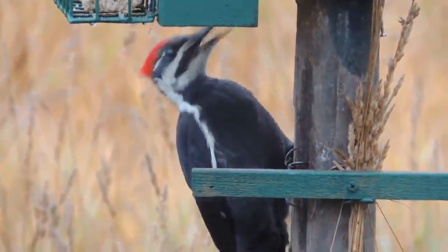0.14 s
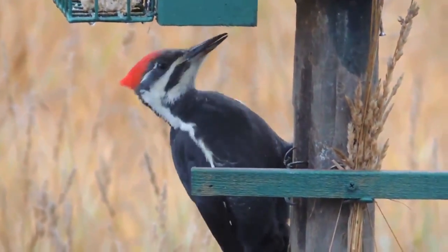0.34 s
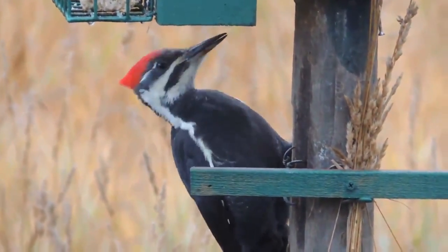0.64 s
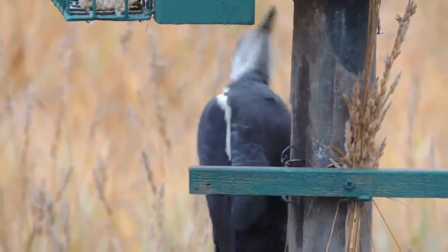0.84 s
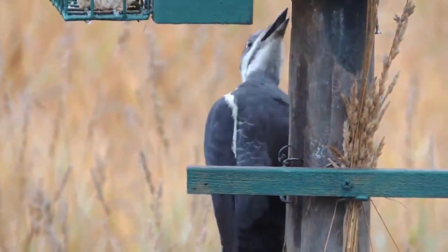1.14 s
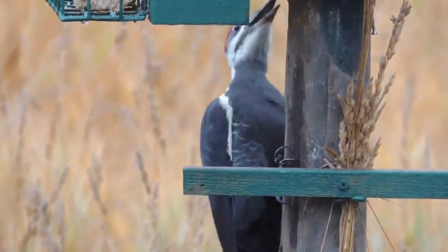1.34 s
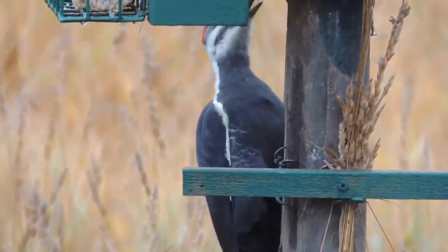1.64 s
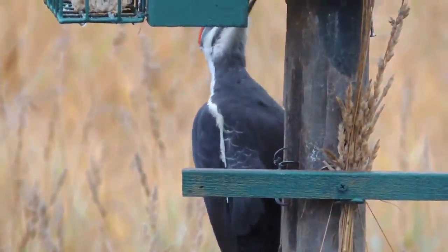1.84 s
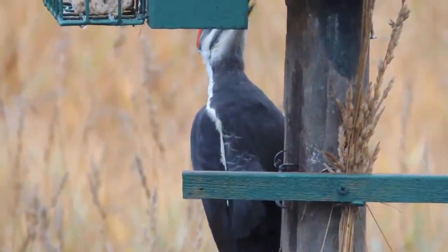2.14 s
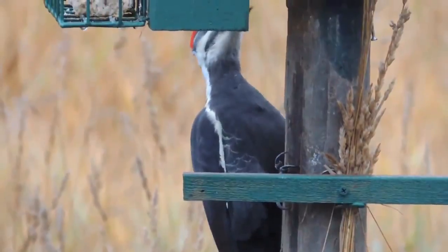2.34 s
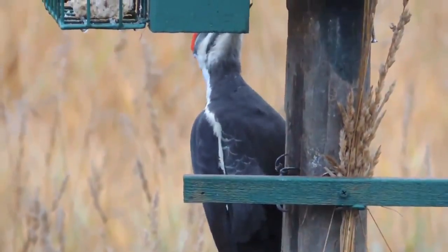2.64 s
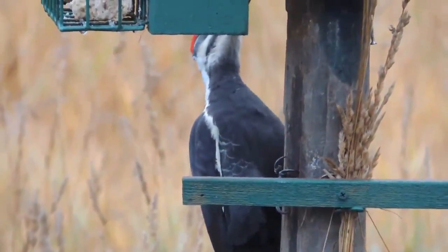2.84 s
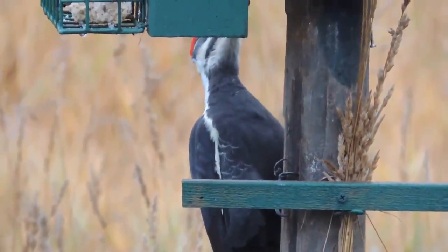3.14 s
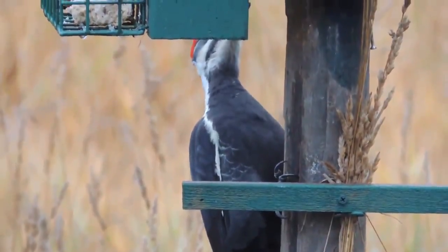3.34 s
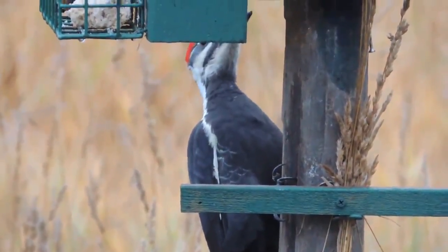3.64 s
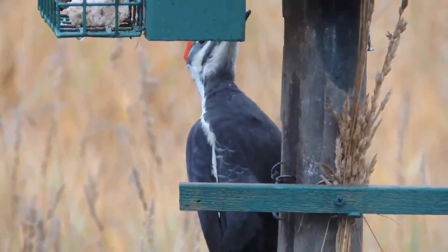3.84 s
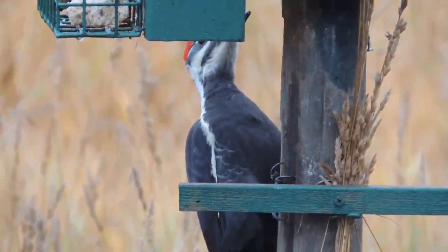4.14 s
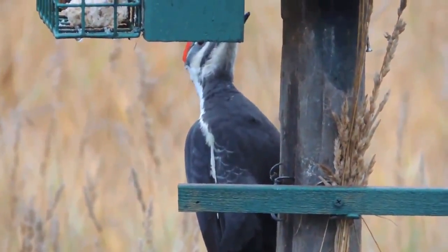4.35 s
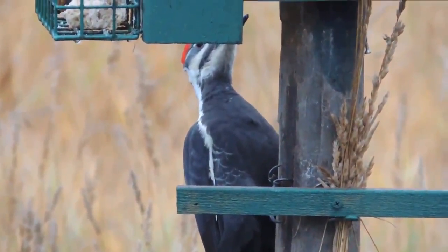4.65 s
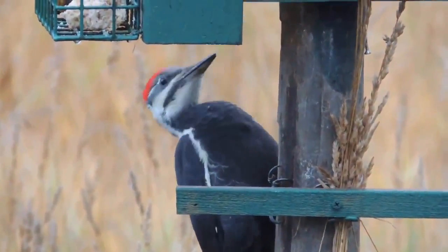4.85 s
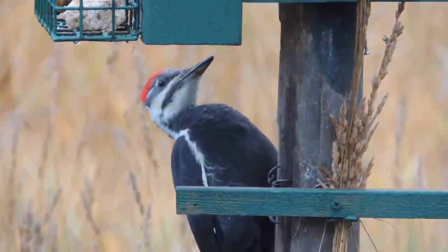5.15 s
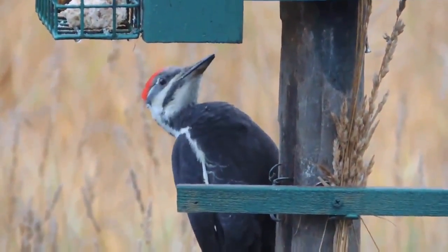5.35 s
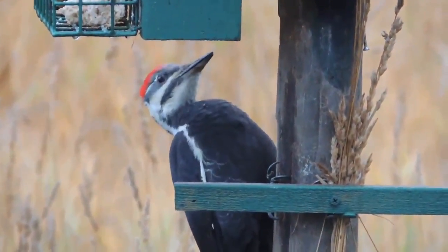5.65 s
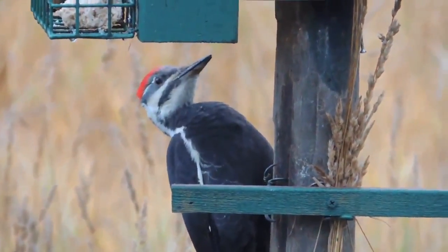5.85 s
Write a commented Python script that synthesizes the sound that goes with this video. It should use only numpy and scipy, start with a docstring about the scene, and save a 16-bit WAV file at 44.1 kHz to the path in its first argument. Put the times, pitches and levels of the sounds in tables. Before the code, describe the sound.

In quiet open air, a woodpecker calls a quick string of short bright yelping notes, followed by small clicks and scrapes.

```python
"""A pileated woodpecker on a feeder post gives one run of fourteen short, arched notes that ring on among the trees.
Each note is a stack of harmonics through moving throat resonances, with noise for the croak and rasp.
Its claws scrape faintly before the call, then tick and scrape on the wood as it shifts: ringing crackle and
grainy noise. Under it lie a faint low hoot, a gliding sine, and the shaped noise of still open air: rumble and hiss."""
import sys
import numpy as np
from scipy import signal
from scipy.fft import rfft, irfft, next_fast_len
from scipy.io import wavfile

SR = 44100
rng = np.random.default_rng(int(sys.argv[2]) if len(sys.argv) > 2 else 0)


def wav_out(sig):
    """Save sig, one row per channel (or a flat mono array), as 16-bit PCM at SR to the path in sys.argv[1]."""
    wavfile.write(sys.argv[1], SR, np.round(np.clip(np.atleast_2d(sig).T, -1, 1) * 32767).astype(np.int16))


N = 264159
TIME = np.arange(N) / SR

# the notes of the call: start_s, length_s, top_pitch_hz, level_db (before voice colour and swell)
CALL_NOTES = [(1.003, 0.039, 875, -32), (1.134, .046, 1004, -26), (1.261, 0.051, 1028, -24.5),
              (1.389, 0.053, 1053, -22), (1.517, 0.055, 1066, -22.5), (1.644, 0.053, 1077, -21),
              (1.772, 0.052, 1071, -18), (1.896, 0.053, 1079, -18.5), (2.021, 0.054, 1077, -18),
              (2.149, 0.057, 1094, -18), (2.282, 0.058, 1101, -17), (2.416, 0.058, 1095, -17.5),
              (2.553, 0.06, 1098, -17.5), (2.694, 0.061, 1079, -18.5)]
# claw ticks on the post: start_s, peak_db (before left-right balance), ring_hz
CLAW_TICKS = [(3.982, -31, 5800), (4.653, -28.5, 9500), (5.109, -39, 10500), (5.138, -30.5, 8150),
              (5.423, -39, 9500), (5.44, -35, 5900), (5.7996, -29.5, 6650), (5.8178, -23, 5940)]


def from_db(db):
    """Decibels to gain."""
    return 10 ** (np.asarray(db) / 20)


def rms_one(x):
    """Scale to unit rms."""
    return x / np.sqrt(np.mean(x ** 2) + 1e-20)


def ramp(x):
    """Hold a share between 0 and 1."""
    return np.clip(x, 0, 1)


def at_hz(points, hz):
    """Read a table on a log-frequency axis."""
    points = np.array(points)
    return np.interp(np.log(np.maximum(hz, 1)), np.log(points[:, 0]), points[:, 1])


def coloured(x, spectrum):
    """Shape noise with an EQ curve of (hz, gain_db)."""
    size = next_fast_len(x.shape[-1])
    gain = from_db(at_hz(spectrum, np.fft.rfftfreq(size, 1 / SR)))
    return irfft(rfft(x, size) * gain, size)[..., :x.shape[-1]]


def waver(t, per_s):
    """Random control curve: per_s normal random values a second, joined by straight lines."""
    knots = t * per_s
    return np.interp(knots, np.arange(4096), rng.standard_normal(4096))


def resonate(x, hz, width_hz):
    """A two-pole resonance with gain 1 on top."""
    r = np.exp(-np.pi * width_hz / SR)
    return signal.lfilter(np.array([1, 0, -1]) * (1 - r * r) / 2, [1, -2 * r * np.cos(2 * np.pi * hz / SR), r * r], x)


def add(out, s, sound):
    """Mix a sound in at time s."""
    at = round(s * SR)
    out[..., at:at + sound.shape[-1]] += sound[..., :N - at]


def woodpecker():
    """The run of notes, each voiced by the syrinx and throat."""
    out = np.zeros((2, N))
    for s, *shape in CALL_NOTES:
        add(out, s, note(s, *shape))
    return out


def note(s, length, top_hz, level_db, scoop_treble_db=-6, rasp_hz=7000, rasp_width_hz=7000):
    """One arched note: the syrinx scoops up hoarsely, locks into a harmonic tone and loses its treble as it closes."""
    # the beak opens as the run gets going: time_s, opening (about 1 = wide)
    beak_run = [(1.25, 0), (1.4, 0.27), (1.65, 0.47), (1.95, 1.17), (2.6, 1.41)]
    # stereo place of the voice: pitch_hz, left_minus_right_db
    side_curve = [(1000, 2), (1900, -0.5), (2150, -4), (4800, 1), (6800, -5), (13000, -1)]
    # phase between the sides: pitch_hz, right_lead_radians
    lead_curve = [(1000, 0.29), (2100, 0.76), (4800, 0.64), (6800, 0.62), (13000, 0.69)]
    t = np.arange(int(.08 * SR)) / SR
    share = t / length

    # within a note the beak starts narrow, opens, and closes again at the end
    beak_wait_s, beak_opens_s, beak_closes_s = 0.0033, 0.028, 0.0043
    beak = np.interp(s, *np.transpose(beak_run))
    opening = beak * ramp((t - beak_wait_s) / beak_opens_s) * ramp(.5 + (length - t) / beak_closes_s)

    # the scoop into a note is slow at first and quickens as the bird warms up
    first_scoop_s, warm_scoop_s, warm_up_s = 0.0223, 0.0044, 0.44
    scoop_s = warm_scoop_s + (first_scoop_s - warm_scoop_s) * np.exp((CALL_NOTES[0][0] - s) / warm_up_s)
    scoop = ramp(1 - t / scoop_s)
    # the voice is unlocked in the scoop, and partly again near the end
    unlocked = np.sqrt(scoop) + np.exp(-((share - .96) / .07) ** 2) / 2

    # the tone locks just after the scoop, with a short burst of treble
    lock_s, burst_s, burst_treble_db = 0.0055, 0.001, 0.5
    attack_s = scoop_s + lock_s
    burst = np.exp(-((t - attack_s) / burst_s) ** 2)
    bright_db = treble_db(t, length, level_db, beak) + scoop_treble_db * np.sqrt(scoop) + burst_treble_db * burst

    # the membranes will not swing slower than their slack pitch
    scoop_semitones, lowest_hz = 3.5, 800
    semitones = arch(t, length) - scoop_semitones * scoop * np.sqrt(scoop)
    pitch = np.maximum(top_hz * 2 ** (semitones / 12), lowest_hz)
    jitter, unlocked_jitter = .0045, .022   # shares of the pitch
    wobble = (jitter + unlocked_jitter * unlocked) * waver(t, 1100)
    phase = 2 * np.pi * np.cumsum(pitch * (1 + wobble)) / SR

    flutter_db, uneven_db = 2.5, 2.2
    out = np.zeros((2, len(t)))
    for k in range(1, 18):
        hz = k * pitch
        high = ramp((hz - 2500) / 3500)   # brightness acts fully from 6 kHz up
        # the upper harmonics flutter and vary from note to note more than the first two
        unsteady_db = flutter_db * waver(t, 400) + uneven_db * rng.standard_normal()
        unsteady_db = (.2 if k < 3 else 1) * unsteady_db
        gain = throat(hz, opening) * from_db(high * bright_db + unsteady_db)
        angle = k * phase - k * k / 2   # the throat delays high harmonics, smearing each pulse
        side_db, lead = at_hz(side_curve, hz) / 2, at_hz(lead_curve, hz)
        left = from_db(side_db) * np.sin(angle)
        right = from_db(-side_db) * np.sin(angle + lead)
        out += gain * np.array([left, right])

    # air rasps through the membranes once a cycle, most while they start and stop
    rasp_db, unlocked_rasp_db = -29, 12
    rasp = rms_one(resonate(rng.standard_normal(len(t)), rasp_hz, rasp_width_hz)) * (1 + np.cos(phase))
    out += from_db(rasp_db + bright_db + unlocked_rasp_db * unlocked) * rasp

    # until it locks, the voice carries a low croak of noise
    croak_hz, croak_width_hz, croak_db = 1620, 310, -15.5
    croak = resonate(rng.standard_normal(len(t)), croak_hz, croak_width_hz)
    croak = resonate(croak, croak_hz, croak_width_hz)
    out += from_db(croak_db) * ramp(1 - t / attack_s) * rms_one(croak)

    ends = ramp(t / .002) * ramp((1.2 - share) / .1)
    return out * ends * from_db(level_db + push_db(t, length, attack_s, beak))


def throat(hz, opening):
    """Gain of the throat: steep-sided resonances whose heights shift as the beak opens."""
    # resonances that colour the voice: centre_hz, half_width_hz (9 dB down), narrow_beak_db, open_beak_db
    resonances = [(1025, 380, -15, -25.5), (1510, 167, 0.5, -0.5), (1988, 155, 3, -1.5), (2203, 84, 9, 3),
                  (2584, 210, -14.5, -14), (3300, 1100, -23.5, -40), (4450, 620, -26, -14.5),
                  (5460, 132, -12.5, -8.5), (6175, 280, -8.5, -12.5), (6796, 280, -10, -7),
                  (7920, 350, -15.5, -17), (8790, 370, -21.5, -17), (9780, 380, -24.5, -21),
                  (11740, 2100, -20, -45), (12300, 1660, -46, -27.5), (7800, 880, -40, -23.5)]
    power = 0
    for centre, width, narrow_db, open_db in resonances:
        height = from_db(narrow_db + opening * (open_db - narrow_db))
        power = power + height ** 2 / (1 + ((hz - centre) / width) ** 2) ** 3
    return np.sqrt(power)


def arch(t, length):
    """Semitones from the top pitch: a slow rounded rise, then a quick fall."""
    # place of the top, time up to it from a semitone below, time down from it to a semitone below
    top_share, rise_s, fall_s, deepest_fall_semitones = .72, .0235, 0.0156, 4.4
    late = t - top_share * length
    return -np.where(late < 0, (late / rise_s) ** 2, np.minimum((late / fall_s) ** 2, deepest_fall_semitones))


def push_db(t, length, attack_s, beak):
    """Loudness through a note: soft attack, a hold that fades (beak narrow) or swells (wide open), release."""
    start_db, release_s, release_db_per_s = -14, 0.0045, 1700
    swell_narrow_db, swell_open_db = -6, -1
    swell_db = swell_narrow_db + beak * (swell_open_db - swell_narrow_db)
    attack_db = start_db * ramp(1 - (t / attack_s) ** 2)
    closing = np.maximum(t - length + release_s, 0)
    return attack_db + swell_db * (ramp(t / length) - .5) - release_db_per_s * closing


def treble_db(t, length, level_db, beak):
    """Brightness through a note: thinner with an open beak or soft voice, cut off early as the note closes."""
    narrow_db, open_db, release_s, release_db_per_s = 11, 1.5, 0.013, 896
    full_voice_db, soft_dulling = -17, 0.78   # dulling is dB of treble per dB of level
    held_db = narrow_db + beak * (open_db - narrow_db) + soft_dulling * min(level_db - full_voice_db, 0)
    return held_db - release_db_per_s * np.maximum(t - length + release_s, 0)


def claws(snap_hz=13000, ring_width_share=0.35, snap_width_hz=2000, grain_db=4, first_snap=8):
    """Ticks are snaps with a brief crackle, ringing in the claw and wood; scrapes are grainy swells of friction."""
    # colour of the friction noise: pitch_hz, gain_db (relative)
    scrape_colour = [(1000, -42), (2500, 1.5), (4500, -3), (7000, 0.5), (10000, -5.5), (15000, -13)]
    # ringing of the post under a dragging claw: ring_hz, width_hz, gain_db (relative)
    post_modes = [(3600, 74, 7), (4470, 77, 10), (5040, 62, 6), (6370, 440, -1)]
    tick_t60_s, tick_snap_db = 0.017, -8.5
    out, t = np.zeros(N), np.arange(2048) / SR
    for s, peak_db, hz in CLAW_TICKS:
        crackle = rng.standard_normal(len(t)) * from_db(-60 * t / tick_t60_s)
        crackle[0] = first_snap   # the claw catches with one hard snap
        width_hz = ring_width_share * hz
        ringing = resonate(resonate(crackle, hz, width_hz), hz, width_hz)
        tick = ringing + from_db(tick_snap_db) * resonate(crackle, snap_hz, snap_width_hz)
        add(out, s, from_db(peak_db) * tick / np.abs(tick).max())

    grains = rng.standard_normal(N) * from_db(grain_db * waver(TIME, 500))
    friction = rms_one(coloured(grains, scrape_colour))
    squeak = rms_one(sum(from_db(db) * resonate(friction, hz, width) for hz, width, db in post_modes))
    # the harder a claw drags, the more the post squeaks, up to full squeak at the hard drag level
    hard_drag_db, squeak_db = -52.5, 2
    pressure = rubbing()
    squeak_gain = from_db(squeak_db) * ramp(pressure / from_db(hard_drag_db))
    return out + pressure * (friction + squeak_gain * squeak)


def rubbing():
    """Strength of the friction on the post: scrapes, a drag after each tick, and feathers brushing at random."""
    # longer scrapes on the post: middle_s, half_length_s (17 dB down), level_db (before squeak and balance)
    scrapes = [(0.711, .024, -56), (0.894, 0.043, -62), (4.728, 0.054, -61.5), (5.066, 0.028, -59),
               (5.263, .05, -61.5), (5.933, .033, -55.5)]
    drag_delay_s, drag_half_length_s, drag_db = 0.0073, 0.037, -62.5
    drags = [(s + drag_delay_s, drag_half_length_s, drag_db) for s, *_ in CLAW_TICKS]
    strokes = sum(from_db(db) * np.exp(-2 * ((TIME - s) / half_length) ** 2)
                  for s, half_length, db in [*scrapes, *drags])
    # brushing builds up once the bird starts to shift
    shift_start_s, shift_build_s = 3.45, 3.9
    brush_db, brush_spread_db, brushes_per_s = -60.5, 4, 22
    shifting = ramp((TIME - shift_start_s) / shift_build_s)
    brushing = shifting * from_db(brush_db + brush_spread_db * waver(TIME, brushes_per_s))
    return np.hypot(strokes, brushing)


def trees(x, t60=0.97, treble_t60=0.59, treble_hz=3000, tail_db=-25, build_s=0.048):
    """A few near reflections, then a thin tail scattered back by trunks and brush; its treble dies first."""
    # near reflections: delay_s, left_db, right_db
    echoes = [(.0085, -27, -26), (.021, -23, -17), (.047, -24.5, -37)]
    # colour of the sound scattered back: pitch_hz, gain_db (relative)
    tree_colour = [(500, -10), (1200, 13), (1950, 7), (2200, 6), (2600, 20.5), (4300, 5.5), (6500, 5),
                   (14000, 7.5)]
    t = np.arange(int(1.5 * SR)) / SR
    build = 1 - np.exp(-t / build_s)
    envelope = build * from_db(-60 * t / t60)
    treble_envelope = build * from_db(-60 * t / treble_t60)
    scatter = coloured(rng.standard_normal((2, len(t))), tree_colour)
    low = signal.sosfiltfilt(signal.butter(4, treble_hz, fs=SR, output="sos"), scatter)
    tail = low * envelope + (scatter - low) * treble_envelope
    response = from_db(tail_db) * tail / np.sqrt(np.sum(envelope ** 2))
    for delay, *levels_db in echoes:
        response[:, round(delay * SR)] += from_db(levels_db)
    return signal.fftconvolve(x, response, axes=1)[:, :N]


def far_hoot():
    """A faint, slightly rising low tone from far off: a sine that swells and fades."""
    start_s, length_s, from_hz, to_hz, peak_db = .39, .26, 330, 352, -57.5
    share = np.clip((TIME - start_s) / length_s, 0, 1)
    pitch = from_hz + (to_hz - from_hz) * share
    return from_db(peak_db) * np.sin(np.pi * share) * np.sin(2 * np.pi * np.cumsum(pitch) / SR)


def air():
    """Distant rumble, nearly alike in both ears, under a wide even hiss."""
    # colour of the open air: pitch_hz, gain_db (relative)
    air_colour = [(12, -46), (20, 2.5), (108, -6.5), (278, -11), (337, -11), (421, -13), (656, -12.5),
                  (865, -15.5), (1640, -19.5), (2620, -19.5), (3010, -21), (6180, -23.5), (9630, -24.5),
                  (13400, -25), (15000, -30)]
    # left-right likeness of the air: pitch_hz, correlation (1 = same in both ears)
    likeness = [(60, 0.92), (150, 0.81), (380, 0.52), (940, 0.16), (2370, 0.024), (5940, 0.0082),
                (14900, 0.01)]
    level_db = -52
    size = next_fast_len(N)
    alike = np.clip(at_hz(likeness, np.fft.rfftfreq(size, 1 / SR)), 0, 1)
    mid, side = rfft(rng.standard_normal((2, size)))
    spectrum = np.sqrt(1 + alike) * mid + np.sqrt(1 - alike) * side * [[1], [-1]]
    white = irfft(spectrum, size)[:, :N]
    return from_db(level_db) * rms_one(coloured(white, air_colour))


def scene(claw_left_db=-3.0, claw_right_db=1):
    """The bird's voice, its claws a little to the right, with the trees and the air around it."""
    bird = woodpecker() + claws() * from_db([[claw_left_db], [claw_right_db]])
    return bird + trees(bird) + air() + far_hoot()


def record(dry):
    """The top is cut steeply by an elliptic low-pass."""
    cutoff_hz = 14500
    return signal.sosfilt(signal.ellip(12, .1, 90, cutoff_hz, fs=SR, output="sos"), dry)


dry = scene()
out = record(dry)
wav_out(out)
```